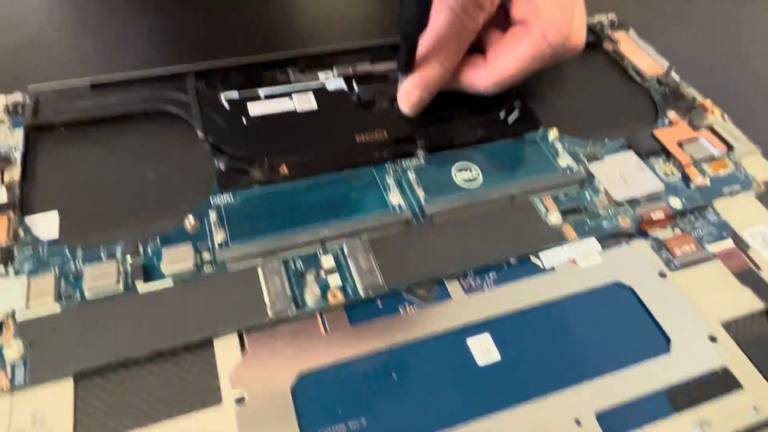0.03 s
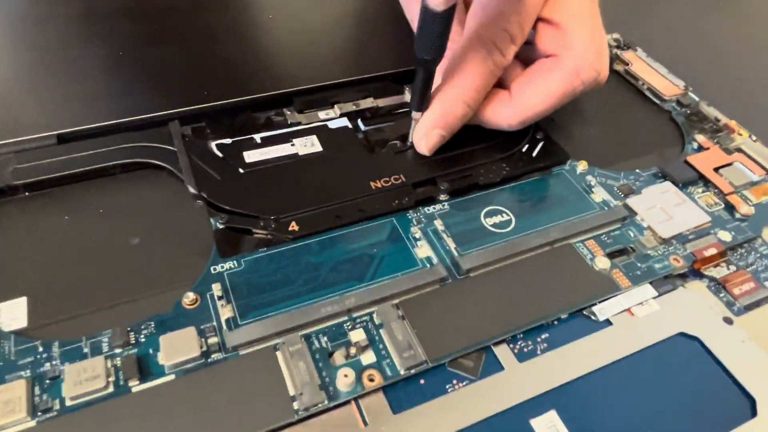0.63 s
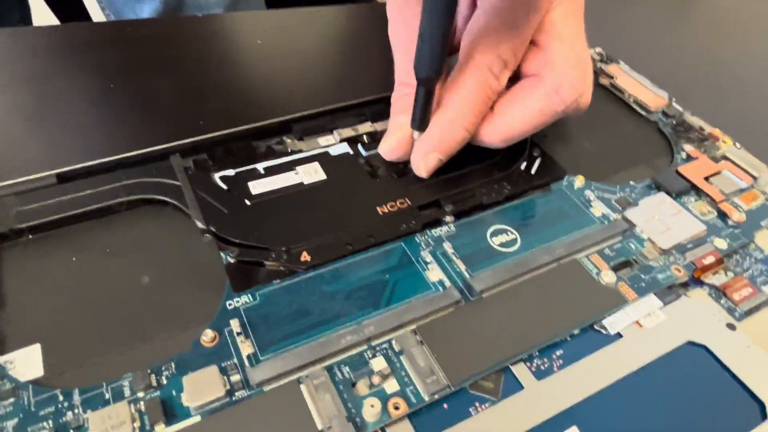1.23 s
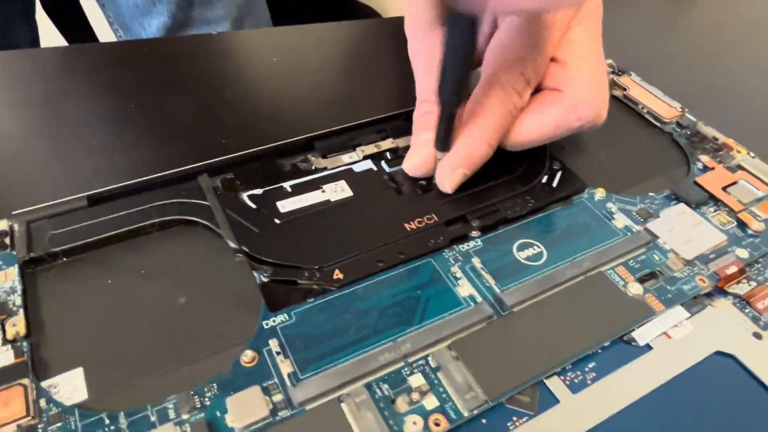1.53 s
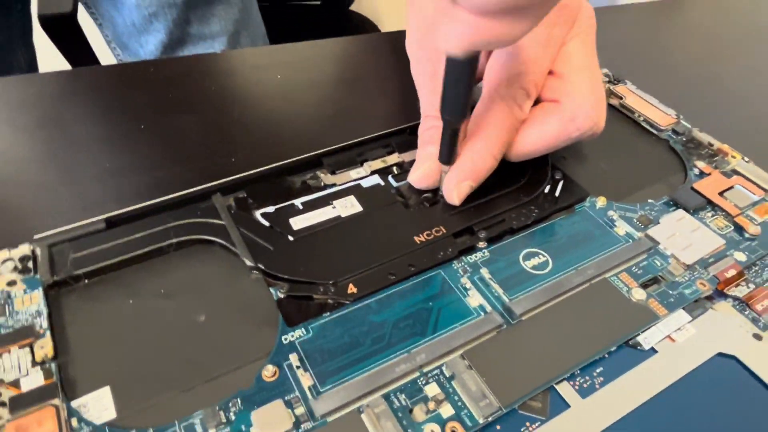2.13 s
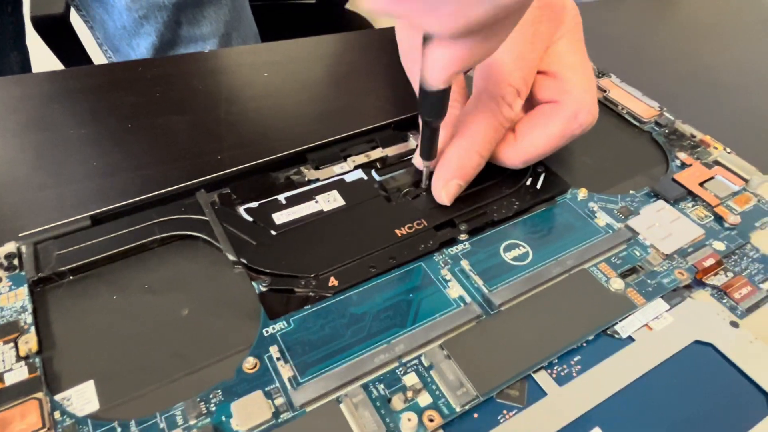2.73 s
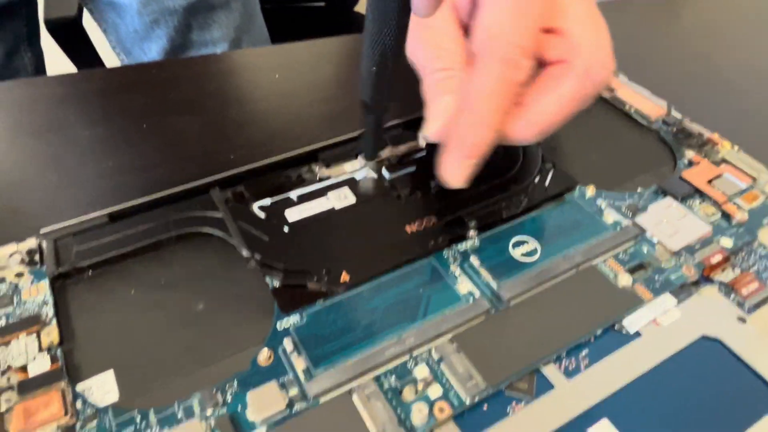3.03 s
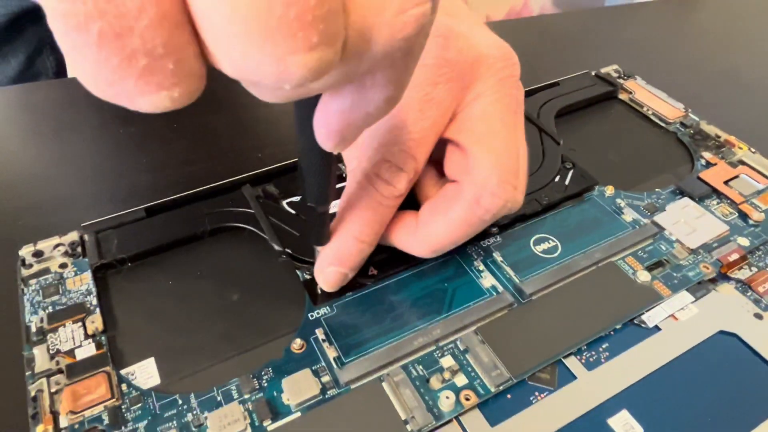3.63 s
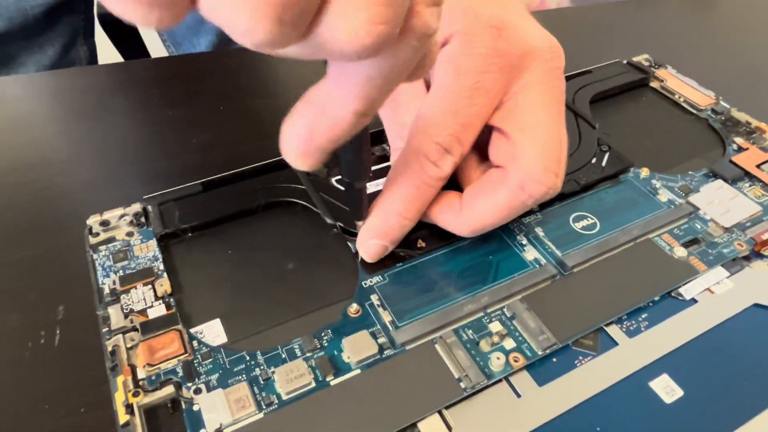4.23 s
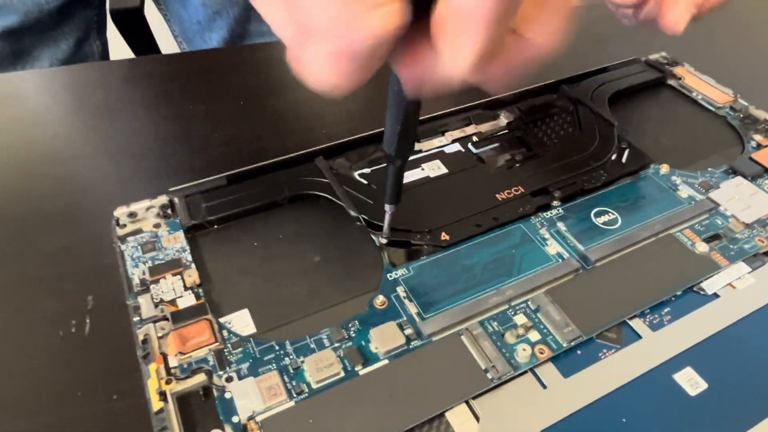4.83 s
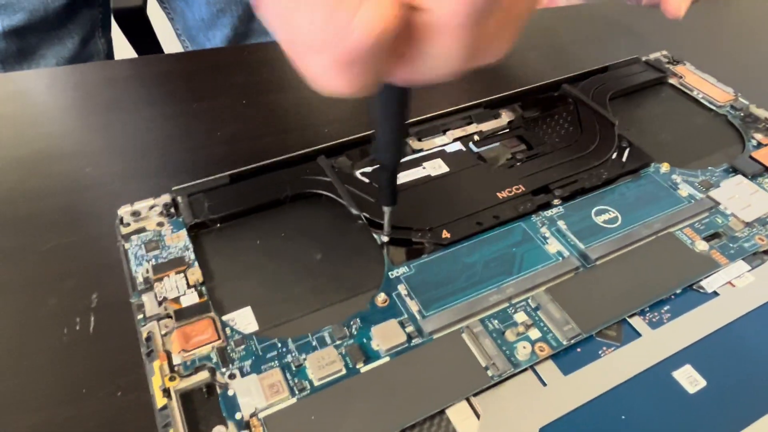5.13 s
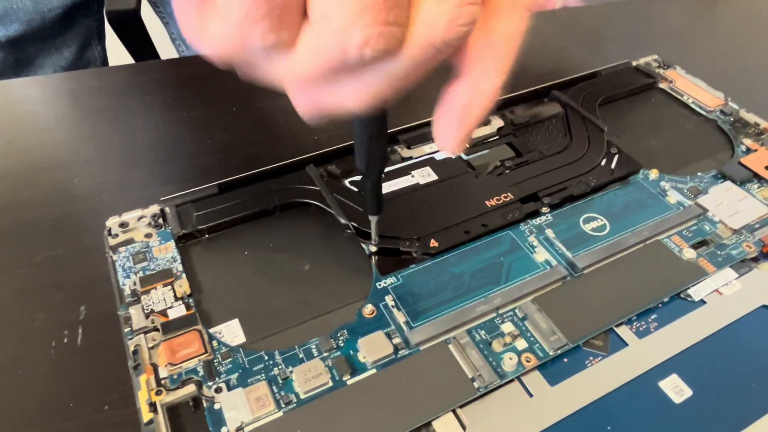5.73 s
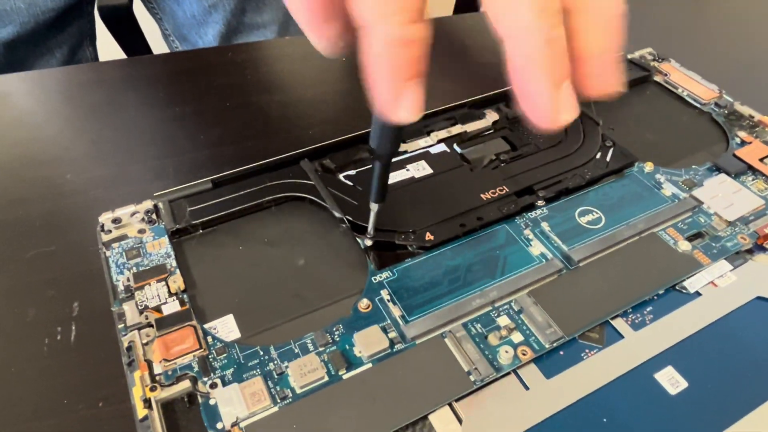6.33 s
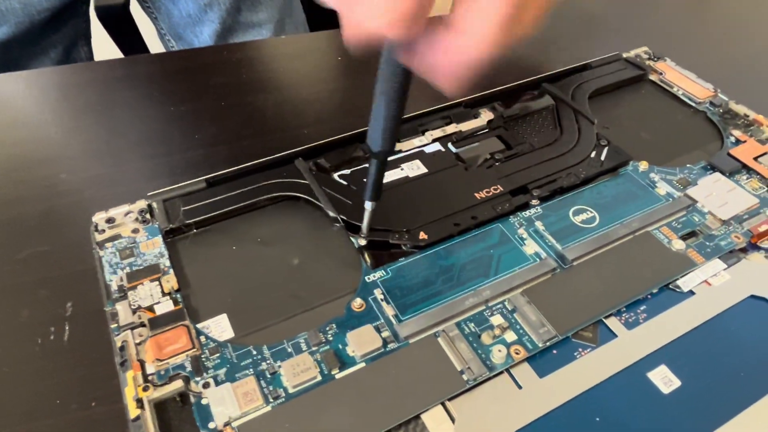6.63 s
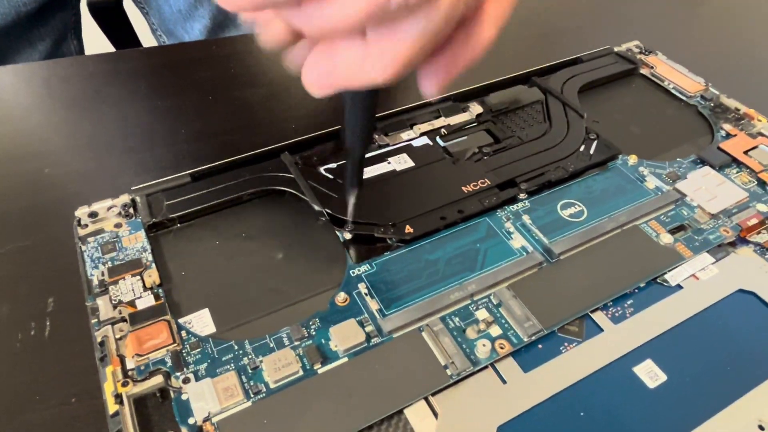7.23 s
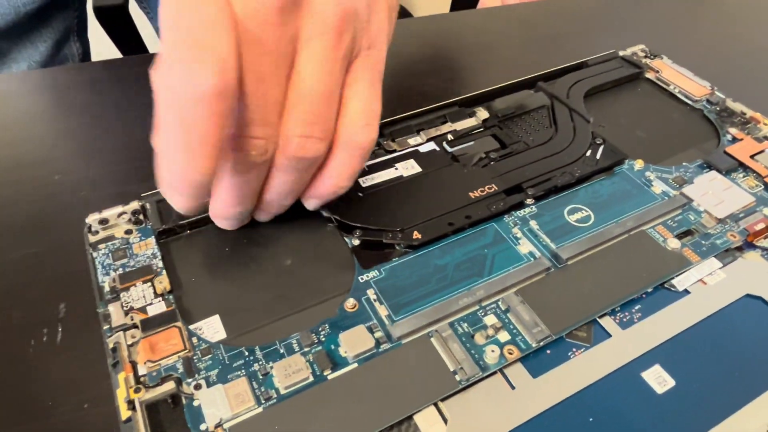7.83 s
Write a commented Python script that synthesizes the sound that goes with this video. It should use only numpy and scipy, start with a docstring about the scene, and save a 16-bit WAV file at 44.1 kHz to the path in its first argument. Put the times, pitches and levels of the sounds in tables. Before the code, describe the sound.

Small metal clicks, short scraping twists and soft finger rubs as a screwdriver loosens laptop screws, over a faint low hum.

```python
"""A low ventilation rumble, and over it a small screwdriver skids and clicks into a screw head.
It is undoing the heatsink screws of an open laptop on a workbench, close to two microphones.
Fingers slide and rub on the grip, the bit creaks and squeaks, the laptop rocks and the thread scrapes.
Each click makes the laptop ring, and a loosened screw snaps twice over the end of its thread.
A small room adds its echo."""
import sys
import numpy as np
from scipy import signal
from scipy.fft import rfft, irfft
from scipy.io import wavfile
from scipy.ndimage import uniform_filter1d

SR = 44100
rng = np.random.default_rng(int(sys.argv[2]) if len(sys.argv) > 2 else 0)


def inscribe(sig):
    """Save sig as 16-bit PCM at rate SR to the path in sys.argv[1].

    A 1-D sig is mono; a 2-D sig holds one channel per row.
    Samples are clipped to [-1, 1] before scaling.
    """
    pcm = np.round(np.clip(np.atleast_2d(sig).T, -1, 1) * 32767)
    wavfile.write(sys.argv[1], SR, pcm.astype(np.int16))


N = 355754


def gain_of(db):
    """Turns decibels into a number to multiply a sound by."""
    return 10 ** (np.asarray(db) / 20)

def evened(x):
    """Scales a signal to an average size (rms) of 1."""
    return x / np.sqrt(np.mean(x ** 2) + 1e-20)

def look_up(rows, hz, column=1):
    """Reads a table at any pitch, blending between its rows."""
    table = np.array(rows, float)
    return np.interp(np.log(hz + 1), np.log(table[:, 0] + 1), table[:, column])

def add(mix, start_s, sound):
    """Mixes a sound in at start_s."""
    part = mix[max(round(start_s * SR), 0):][:len(sound)]
    part += sound[:len(part)]

def wander(per_s):
    """A smooth random curve that changes about per_s times a second."""
    hz = np.fft.rfftfreq(N, 1 / SR)
    return evened(irfft(rfft(rng.standard_normal(N)) / (1 + (hz / per_s) ** 4), N))

def coloured(x, tone):
    """Shapes the lows and highs of a signal with a tone table, then evens its size."""
    gains = gain_of(look_up(tone, np.fft.rfftfreq(N, 1 / SR)))
    return evened(irfft(rfft(x) * gains, N))


# Tone of the ventilation and of the still air: pitch_hz, level_db
RUMBLE_TONE = [(15, -35), (27, -10.5), (40, 3.5), (62, 2.5), (80, -6), (120, 1.5), (155, -5), (190, -1),
               (250, -10.5), (330, -15), (400, -20.5), (520, -33.5), (900, -53.5), (4000, -90.5)]
AIR_TONE = [(100, -2.5), (500, 5.5), (800, -4.5), (1080, 5), (1400, 0), (2300, -0.5), (4000, -5),
            (7000, -13), (11000, -13), (16000, -23.5)]
# How the rumble rises and falls: time_s, level_db
RUMBLE_LEVELS = [(0.0, -53), (0.29, -51.5), (0.78, -50.5), (2.43, -53.5), (3.39, -62.5), (3.62, -57),
                 (3.89, -53.5), (6.0, -59.5), (6.36, -58.5), (7.42, -62.5), (8.07, -60.5)]
# Hum of the mains and a fan: pitch_hz, level_db
HUM_NOTES = [(61, -67.5), (120, -69.5), (199, -72), (302, -77.5), (336, -80), (1082, -89)]

def background(rumble_db=3, air_db=-76, waver=0.0089, swell_db=1):
    """Ventilation rumbles under a wavering hum and the faint hiss of still air."""
    t = np.arange(N) / SR
    level_db = np.interp(t, *np.transpose(RUMBLE_LEVELS)) + rumble_db + swell_db * wander(9.1)
    rumble = gain_of(level_db) * coloured(rng.standard_normal((2, N)), RUMBLE_TONE)
    air = gain_of(air_db) * coloured(rng.standard_normal((2, N)), AIR_TONE)
    wavering_t = np.cumsum(1 + waver * wander(13)) / SR
    hum = sum(gain_of(db) * np.sqrt(2) * np.sin(2 * np.pi * (hz * wavering_t + rng.random()))
              for hz, db in HUM_NOTES)
    return microphones(rumble + air) + microphones(hum)


def patchy(x, depth_db=3.0):
    """The touching spot wanders, so patches of low and high sound come and go."""
    spectrum = signal.stft(x, nperseg=512, noverlap=384)[2]
    patches = rng.standard_normal(spectrum.shape[1:])
    for _ in range(2):
        patches = uniform_filter1d(patches, size=7, axis=0)  # blur over pitch
        patches = uniform_filter1d(patches, size=14, axis=1)  # blur over time
    spectrum *= gain_of(depth_db * evened(patches))
    return evened(signal.istft(spectrum, nperseg=512, noverlap=384)[1][:, :N])

def friction(tone, slips_per_s, spread_db, hiss, flutter_db):
    """Rubbing is many tiny slips of uneven size over a smooth hiss, coming in clumps."""
    sizes = gain_of(spread_db * np.minimum(rng.exponential(1, (2, N)), 4))
    slips = sizes * rng.choice([-1, 1], (2, N)) * (rng.random((2, N)) < slips_per_s / SR)
    rub = evened(slips) + hiss * rng.standard_normal((2, N))
    clumps = gain_of(flutter_db * wander(31))
    return microphones(coloured(patchy(rub * clumps), tone))

def arch(length_s):
    """A smooth swell and fade."""
    return np.sin(np.pi * np.arange(0, length_s, 1 / SR) / length_s).clip(0) ** 1.6

# Fingers slide to a new hold: start_s, length_s, skin_hiss_db, grip_rub_db
FINGER_SLIDES = [(0, .27, -67.5, -98), (0.23, 0.41, -57, -74.5), (0.39, 0.37, -59, -71.5),
                 (0.776, .28, -61.5, -69.5), (0.96, 0.46, -63.5, -73), (1.162, 0.2, -66, -74.5),
                 (1.794, 0.61, -59.5, -70.5), (2.64, .2, -79, -81), (2.839, 0.21, -71, -70),
                 (3.435, 0.27, -85.5, -75.5), (6.782, 0.37, -59, -74), (7.18, 0.046, -61, -68.5),
                 (7.051, 0.55, -77, -92), (7.417, 0.16, -66, -64.5), (7.545, 0.59, -69, -86.5)]

def sliding_skin():
    """Dry skin gives a smooth hiss as it slides."""
    skin_tone = [(300, -26), (700, -0.5), (1500, 1.5), (2300, 1), (3500, -1.0), (5200, -3.0),
                 (6500, -7.5), (8000, -14.5), (16000, -24.5)]  # pitch_hz, level_db
    level = np.zeros(N)
    for start_s, length_s, hiss_db, _ in FINGER_SLIDES:
        add(level, start_s, gain_of(hiss_db) * arch(length_s))
    return level * friction(skin_tone, slips_per_s=5700, spread_db=4.5, hiss=4.3, flutter_db=3)


# The bit skids over a screw head: start_s, length_s, grit_db, scrape_db
BIT_SKIDS = [(0.043, 0.03, -62, -45.5), (0.446, 0.022, -50, -64.5), (2.449, .025, -49.5, -39.5),
             (3.995, 0.025, -68, -44.5)]
# Twists of the screwdriver: catch_time_s, until_push_s, catch_db, push_db, scrape_db
DRIVER_TWISTS = [(0.81, 0.045, -57, -64, -49.5), (1.06, 0.14, -63, -53.5, -54.5),
                 (1.39, 0.13, -63.5, -53.5, -47), (1.708, 0.13, -62, -52.5, -46),
                 (2.039, 0.12, -89, -56, -49), (2.299, 0.099, -64, -59, -57.5),
                 (4.161, 0.049, -65.5, -61.5, -69), (4.393, 0.073, -62, -54, -56.5),
                 (4.644, 0.13, -61.5, -54, -50.5), (4.986, 0.12, -64, -56.5, -55),
                 (5.34, 0.15, -61, -52.5, -52.5), (5.765, 0.11, -67, -56.5, -54.5),
                 (6.102, 0.12, -69, -58, -55.5), (6.458, 0.12, -64.5, -60.5, -64),
                 (6.822, 0.099, -64.5, -66.5, -53.5)]
# Tone of skin on the grip, and of the thread heard through the case: pitch_hz, level_db
GRIP_TONE = [(300, -26), (1500, -9), (2700, -1.5), (4300, -10), (6300, -4.5), (7300, -2.5), (10000, -1.5),
             (12500, -2), (14000, -4.5), (15500, -5.5), (16200, -28)]
THREAD_TONE = [(200, -28.5), (420, 3.5), (600, 0), (1000, 2.5), (1500, -3.5), (2000, -13), (2600, -6),
               (3500, -13), (5000, -17.5), (7500, -24.5), (16000, -45)]

def grip_and_thread(grip_db=1.0, thread_catch_db=-20.5, skid_rise_db=14):
    """Each twist rubs the grip and grinds the thread; skids and slides rub the same way."""
    grip, thread = np.zeros((2, N))  # how loud each is over time
    for start_s, length_s, _, rub_db in FINGER_SLIDES:
        add(grip, start_s, gain_of(rub_db) * arch(length_s))
    for start_s, length_s, grit_db, scrape_db in BIT_SKIDS:
        harder_db = np.linspace(-skid_rise_db, 0, round(length_s * SR))  # until the bit drops in
        add(grip, start_s, gain_of(grit_db + harder_db))
        add(thread, start_s, gain_of(scrape_db + harder_db))
    margin_s = 0.1
    for catch_time_s, until_push_s, catch_db, push_db, scrape_db in DRIVER_TWISTS:
        catch, push = twist(until_push_s, margin_s)
        start_s = catch_time_s - margin_s
        add(grip, start_s, gain_of(catch_db) * catch + gain_of(push_db) * push)
        add(thread, start_s, gain_of(scrape_db) * (gain_of(thread_catch_db) * catch + push))
    rub = friction(GRIP_TONE, slips_per_s=4900, spread_db=3.5, hiss=0.82, flutter_db=2.5)
    scrape = friction(THREAD_TONE, slips_per_s=500, spread_db=4, hiss=0.45, flutter_db=2)
    return gain_of(grip_db) * grip * rub + thread * scrape

def twist(until_push_s, margin_s, catch_s=0.018, drag_db=-18, rise_s=0.017, fall_s=0.015):
    """Loudness curves of one twist: the fingers catch, then drag lightly, push and let go."""
    t = np.arange(-margin_s, until_push_s + margin_s, 1 / SR)
    catch = np.exp(-(t / catch_s) ** 2)
    take_hold = np.clip(t / catch_s, 0, 1)
    build_up = np.exp(np.minimum(t - until_push_s, 0) / rise_s)
    let_go = np.exp(-np.maximum(t - until_push_s, 0) / fall_s)
    return catch, (gain_of(drag_db) + build_up) * take_hold * let_go


def ring(notes, t, scatter):
    """Notes that each die by 60 dB in fade_s; scatter shifts their waves at random, high ones most."""
    hz, db, fade_s = np.array(notes, float).T[:, :, None]
    phase = np.arange(len(hz))[:, None] / 2  # every second note starts upside down
    phase += scatter * rng.uniform(0.064, 1, hz.shape) * hz / (hz + 2000)
    return (gain_of(db - 60 * t / fade_s) * np.sin(2 * np.pi * (hz * t + phase))).sum(0)

def swell(t, peak_s):
    """Rises to 1 at peak_s, then dies away."""
    return t / peak_s * np.exp(1 - t / peak_s)

def grit(t, peak_s):
    """A burst of gritty noise, loudest near peak_s."""
    shape = swell(t, peak_s)
    burst = shape * rng.standard_normal(len(t))
    for _ in range(3):  # make all pitches equally strong, then shape the burst again
        spectrum = rfft(burst)
        burst = irfft(spectrum / (abs(spectrum) + 1e-12), len(t)) * np.sqrt(shape)
    return burst / np.linalg.norm(burst)

# The bit clicks on screw and heatsink, and the row at 1.838 s with its long crack is a dull crunch of the
# thread grinding at the end of a twist: start_s, level_db, brightness_db, crack_peak_s
BIT_CLICKS = [(0.076, -43, -27.5, 0.0023), (0.2889, -45.5, -21, 0.0012), (0.2947, -46, -13.5, 0.00064),
              (0.2997, -48, -14.5, 0.0023), (0.3176, -47.5, -19.5, 0.00073), (0.4691, -33, -13.5, 0.0021),
              (0.6738, -65, 3.5, 0.00085), (0.8461, -61, 7, 0.0013), (0.895, -58, -2, 0.00069),
              (1.392, -60.5, 1.5, 0.00076), (1.4777, -63, 2, 0.0012), (1.5194, -54, -3, 0.0024),
              (1.811, -64.5, 8, 0.00033), (1.838, -54.5, -11, .008), (2.1546, -49.5, -2.5, 0.0016),
              (2.3878, -67, 13.5, 0.00055), (2.4765, -24, -2, 0.00027), (2.6707, -44, 3.5, 0.0018),
              (2.733, -63, 4.5, 0.00078), (2.886, -63, 11, 0.0013), (2.8941, -51.5, 7, 0.00067),
              (3.2539, -83, 18, 0.00047), (3.4383, -77, 2.5, 0.00063), (3.901, -51, -18.5, 0.0012),
              (3.966, -58.5, -25, 0.0014), (3.9994, -53, -10.5, 0.00074), (4.018, -46, -17.5, 0.0032),
              (4.1459, -76.5, 11.5, .0006), (4.2781, -62, 15, 0.00045), (4.4433, -57.5, 7.5, 0.00065),
              (4.7093, -64.5, -5, 0.00073), (5.106, -59, -9.5, 0.0027), (5.4309, -57, -10, 0.0016),
              (5.4886, -61, 12.5, 0.0013), (5.688, -66, -6.5, .002), (5.724, -56.5, -7.5, 0.0013),
              (5.8949, -51, -16, 0.0013), (6.2126, -53, -19, 0.0019), (6.5532, -33, 6.5, 0.00077),
              (6.914, -29, 2, 0.00055), (7.1693, -68, -2, 0.00072), (7.718, -52.5, -2.5, 0.00073),
              (7.9189, -68.5, -1.5, 0.00071), (8.053, -48.5, 3.5, 0.002)]
# Notes of the laptop with the screwdriver on it, and of its case flexing: pitch_hz, level_db, fade_s
LAPTOP_NOTES = [(601, 0, 0.015), (720, -5.5, 0.013), (1005, -10, 0.042), (1283, 5.5, 0.016),
                (1598, 1, 0.036), (2311, -3.5, .02), (2580, -5.5, .024), (2870, -1, .02), (3424, 0, .022),
                (3738, -4.5, 0.029), (4280, -3.5, 0.02), (5040, -5.5, 0.011), (5536, -5.5, 0.0084),
                (6530, -1.5, 0.011), (7648, -9, 0.018), (7300, -5.5, 0.0068), (8900, -8.5, 0.0087),
                (10170, -1.5, 0.01), (10900, 1, 0.014), (11740, 4, 0.01), (13200, 3.5, 0.023),
                (14500, -6.5, .008)]
FLEX_NOTES = [(252.8, -3, 0.027), (318, 2, 0.02), (435, -4.5, 0.033)]
# Where the laptop's shell, the heatsink plate, the shaft and the tip ring: low_hz, high_hz
PART_RANGES = [(500, 920), (900, 2500), (2500, 6900), (7000, 14800)]
# How much each part rings at the plate's screw, the edge screw, then the heatsink itself:
# from_s, shell_db, plate_db, shaft_db, tip_db
WORK_SPOTS = [(0, 0, 2, -4.5, -3), (3.1, 0, -4.5, -1, -0.5), (7.6, -4, 1.5, 2.5, -3)]

def clicks(crack_db=23, rattle_db=17, spread_db=32, spread_s=0.0018, boost_db=3, flex_db=4):
    """Steel slips on steel with a crack, a rattle and a ring. Gives the direct and room-filling sound."""
    t = np.arange(4096) / SR
    direct, all_round = np.zeros((2, N))
    filters = [signal.butter(4, band, "bandpass", fs=SR, output="sos") for band in PART_RANGES]
    for start_s, level_db, brightness_db, crack_peak_s in BIT_CLICKS:
        spot_db = [levels for from_s, *levels in WORK_SPOTS if from_s <= start_s][-1]
        parts_db = level_db + brightness_db * np.linspace(0, 1, len(filters)) + spot_db
        shell_db, _, shaft_db, _ = parts_db
        body = ring(LAPTOP_NOTES, t, scatter=0.054) * (1 - np.exp(-t / 0.00075))
        crack = gain_of(crack_db) * grit(t, crack_peak_s)
        rattle = gain_of(rattle_db) * grit(t, peak_s=0.0033)
        spread = gain_of(spread_db) * grit(t, spread_s)
        for mix, sound in ((direct, body + crack + rattle), (all_round, body + spread)):
            for band_filter, part_db in zip(filters, parts_db):
                part = signal.sosfilt(band_filter, sound)
                add(mix, start_s, gain_of(part_db + boost_db) * part / np.std(part[:SR // 100]))
            # the whole case flexes only as much as the quieter of shell and shaft rings
            flex = ring(FLEX_NOTES, t, scatter=0) * (1 - np.exp(-t / spread_s))
            add(mix, start_s, gain_of(min(shell_db, shaft_db) + flex_db) * flex)
    return direct, all_round


# Short creaks of the bit and the thread: start_s, pitch_hz, level_db, rise_s
METAL_CREAKS = [(0.192, 703, -50.5, 0.0014), (0.455, 1540, -37.5, 0.00081), (1.063, 860, -47.5, 0.0024),
                (2.092, 966, -41, 0.0029), (2.256, 936.5, -51, 0.0023), (4.277, 3695, -33.5, 0.0011),
                (4.986, 2510, -53, 0.0031), (5.22, 2360, -57, 0.0013), (5.33, 2180, -72, 0.016),
                (5.4, 2500, -59.5, 0.003), (5.487, 6770, -38.5, 0.0023), (5.724, 720, -45.5, 0.0037),
                (5.794, 706, -52.5, 0.0018), (7.442, 4830, -59.5, 0.0078), (7.717, 4440, -41.5, 0.0025),
                (7.812, 3280, -56.5, .004)]

def creaks(roughness=0.17):
    """A quick run of slips sings roughly around one note."""
    t, out = np.arange(4096) / SR, np.zeros(N)
    for start_s, hz, level_db, rise_s in METAL_CREAKS:
        jitter = evened(uniform_filter1d(rng.standard_normal(len(t)), size=24))
        pitch_hz = hz * (1 + roughness * jitter)
        note = np.sin(2 * np.pi * np.cumsum(pitch_hz) / SR)
        add(out, start_s, gain_of(level_db) * swell(t, rise_s) * note)
    return out


# One rising squeak in the screw head: time_s, pitch_hz, level_db
SQUEAK_PATH = [(.51, 1780, -58), (0.529, 1904, -52.5), (.545, 2096, -41.5), (0.561, 2500, -65),
               (.575, 2630, -52.5)]

def squeak(roughness=0.029):
    """The bit sticks and slips faster and faster as it settles in."""
    time_s, hz, level_db = np.transpose(SQUEAK_PATH)
    t = np.arange(N) / SR
    pitch_hz = np.interp(t, time_s, hz) * (1 + roughness * wander(450))
    level = np.interp(t, time_s, gain_of(level_db), left=0, right=0)
    return level * np.sin(2 * np.pi * np.cumsum(pitch_hz) / SR)


# Soft bumps of the laptop: start_s, level_db
LAPTOP_BUMPS = [(0.587, -42), (0.884, -48), (1.232, -41), (2.476, -41), (4.021, -50), (4.451, -41.5),
                (4.475, -42.5), (5.49, -42), (6.556, -41), (6.919, -37), (7.72, -42.5), (8.055, -29.5)]
# Low notes of the laptop rocking on the bench: pitch_hz, level_db, fade_s
BENCH_NOTES = [(62.3, -5.5, 0.32), (93.26, -5, 0.48), (119.4, -1.5, 0.15), (200, -15, 0.12),
               (320, -12.5, 0.14)]

def bumps(rise_s=0.0019):
    """Changes of hand pressure rock the laptop on the bench."""
    t, out = np.arange(SR // 4) / SR, np.zeros(N)
    for start_s, level_db in LAPTOP_BUMPS:
        thud = ring(BENCH_NOTES, t, scatter=0.29) * (1 - np.exp(-t / rise_s))
        add(out, start_s, gain_of(level_db) * thud)
    return out


# The room's echo: pitch_hz, fade_s, level_db
ROOM_ECHO = [(200, 1, -2.5), (590, 0.26, -0.5), (1422, .47, -2), (2500, 0.34, 1), (3930, 0.48, 0.5),
             (6000, 0.44, -3), (9300, 0.17, 0), (15000, .24, -17.5)]

def room(x, first_echo_s=0.0017):
    """Sound bounces off bench and walls, each pitch dying at its own speed."""
    shape = (2, SR * 3 // 4)
    bounces = rng.standard_normal(shape) * (rng.random(shape) < 0.2)
    hz, t, spectrum = signal.stft(bounces, SR, nperseg=256)
    fade_s = look_up(ROOM_ECHO, hz)[:, None]
    level_db = look_up(ROOM_ECHO, hz, column=2)[:, None]
    tail = signal.istft(spectrum * gain_of(level_db - 60 * t / fade_s), SR, nperseg=256)[1]
    tail *= np.clip(np.arange(tail.shape[1]) / SR / first_echo_s - 1, 0, 1)
    tail /= np.linalg.norm(tail[0])
    return microphones(signal.fftconvolve(x[None], tail, axes=1)[:, :N])


# How left and right compare: pitch_hz, likeness (1 same, -1 opposite), left_over_right_db
MICROPHONE_PAIR = [(49.6, .95, -1), (185, 0.78, -4.5), (640, 0.2, 0), (990, 0.22, 2.5), (1580, -0.59, -2),
                   (2130, .2, 0.5), (2930, -0.68, 1), (5118, 0.21, 7.5), (6500, -0.49, 4.5),
                   (7900, -0.3, 2), (9340, 1, -1.5), (10000, 0.84, 0), (12000, -.88, -0.5), (13420, -1, 1),
                   (15500, .7, -1.5)]

def microphones(x):
    """One sound reaches the two microphones out of step; a pair of sounds is partly shared by both."""
    hz, spectrum = np.fft.rfftfreq(N, 1 / SR), rfft(x)
    angle = np.arccos(np.clip(look_up(MICROPHONE_PAIR, hz), -0.99, 0.99)) / 2
    mid, side = (spectrum, 1j * spectrum) if x.ndim == 1 else spectrum
    mid, side = mid * np.cos(angle), side * np.sin(angle)
    lean = gain_of(look_up(MICROPHONE_PAIR, hz, column=2))
    left_right = np.array([(mid + side) * lean, mid - side])
    return irfft(left_right * np.sqrt(2 / (1 + lean ** 2)), N)


def scene(click_echo_db=-15, small_echo_db=-17, rub_echo_db=-12):
    """The work on the laptop, its echo and the room's own sound."""
    direct, all_round = clicks()
    small_sounds = bumps() + squeak() + creaks()
    rubbing = grip_and_thread() + sliding_skin()
    echo = room(gain_of(click_echo_db) * all_round + gain_of(small_echo_db) * small_sounds
                + gain_of(rub_echo_db) * rubbing[0])
    return microphones(direct + small_sounds) + echo + rubbing + background()

def record(dry):
    """Cuts away the very highest treble."""
    top_hz = 15900
    treble_cut = signal.firwin(101, top_hz, window=("kaiser", 9), fs=SR)
    return signal.oaconvolve(dry, treble_cut[None], "same")


dry = scene()
out = record(dry)
inscribe(out)
```